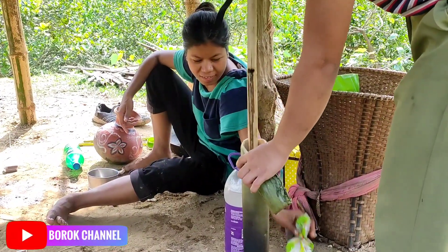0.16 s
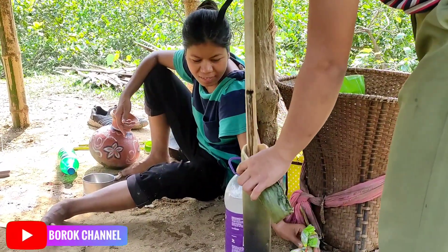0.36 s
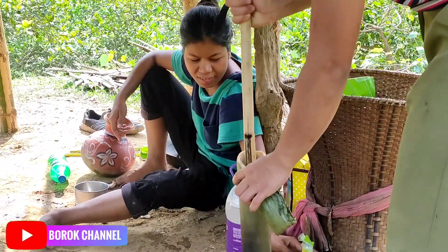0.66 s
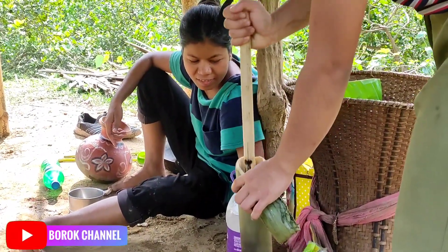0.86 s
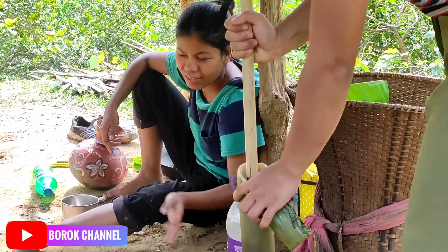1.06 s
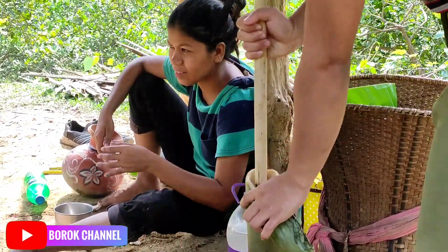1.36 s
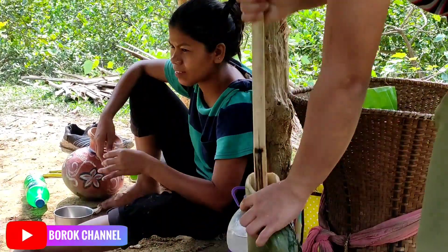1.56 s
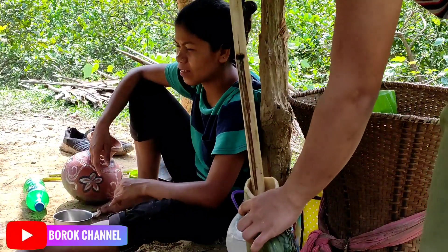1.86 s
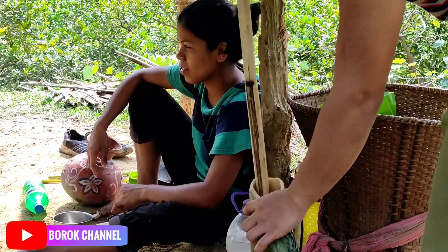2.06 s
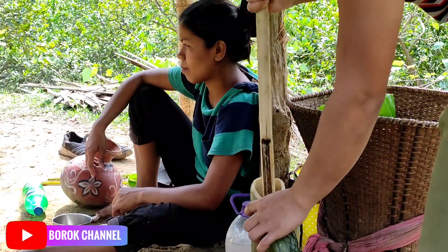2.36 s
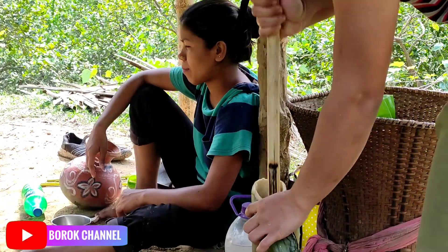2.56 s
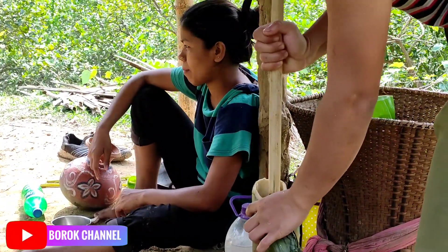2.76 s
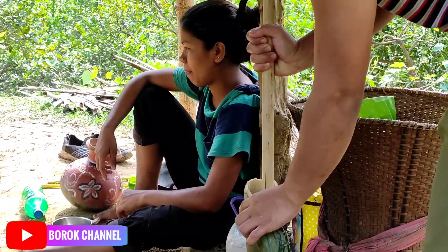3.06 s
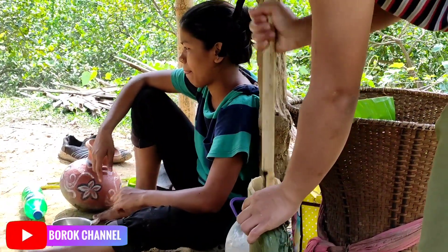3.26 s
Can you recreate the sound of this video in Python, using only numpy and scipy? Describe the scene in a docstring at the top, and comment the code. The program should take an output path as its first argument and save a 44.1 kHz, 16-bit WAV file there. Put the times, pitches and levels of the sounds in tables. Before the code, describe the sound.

A bamboo stick in a green bamboo tube makes a sharp, woody scraping knock at 0.3 s, with small wet ticks crackling until about 1.4 s. A dull short rub comes at 1.7, softer grainy slides at 2.0-2.5, and a muffled thud with a trailing slide at 3.05. Throughout, breeze thumps low on the left, foliage hisses, birds chirp mostly right, and a faint high insect pulses.

```python
"""From the start a breeze thumps on the left microphone port, foliage hisses and an insect pulses high up,
each built from shaped noise or a swept tone; small birds chirp mostly to the right, as gliding whistles.
Soon small wet ticks crackle, then a bamboo stick worked up and down in a green bamboo tube gives a sharp
scraping knock; softer slides follow: grainy friction noise rubs the wall and excites its resonances."""
import sys
import numpy as np
from scipy import signal
from scipy.fft import rfft, irfft, next_fast_len
from scipy.io import wavfile
from scipy.ndimage import uniform_filter1d, map_coordinates

SR = 44100
rng = np.random.default_rng(int(sys.argv[2]) if len(sys.argv) > 2 else 0)


def transcribe(signal):
    """Save signal, clipped to [-1, 1], as a 16-bit WAV file at the path in sys.argv[1]."""
    frames = np.atleast_2d(signal).T
    limited = np.clip(frames, -1, 1)
    pcm = np.round(limited * 32767).astype(np.int16)
    wavfile.write(sys.argv[1], SR, pcm)


N = 149940


def amp(db):
    """Level to amplitude ratio: 20 dB is a factor of ten."""
    return 10 ** (np.asarray(db) / 20)


def unit(x):
    """Normalisation to an rms of 1."""
    return x / np.sqrt(np.mean(x ** 2) + 1e-20)


def clock():
    """Sampling instants in seconds."""
    return np.arange(N) / SR


def curve(rows):
    """Linear interpolation through (seconds, value) points."""
    return np.interp(clock(), *np.transpose(rows))


def pan(db):
    """Interaural level difference: half of it raises the left, half lowers the right."""
    return amp(np.array([[db], [-db]]) / 2)


def filtered(x, response):
    """Linear filtering: the spectrum is multiplied by a response of frequency."""
    size = next_fast_len(N + SR // 2)
    spectrum = rfft(x, size) * response(np.fft.rfftfreq(size, 1 / SR))
    return irfft(spectrum, size)[..., :N]


def coloured(x, points):
    """Spectral shaping by (Hz, dB) points on a logarithmic frequency axis, to rms 1."""
    freq, db = np.transpose(points)
    return unit(filtered(x, lambda hz: amp(np.interp(np.log(hz + 1), np.log(freq), db))))


def wobble(rate):
    """Band-limited random fluctuation: a spline through rate random knots a second."""
    knots = rng.standard_normal(int(N * rate / SR) + 4)
    return map_coordinates(knots, [clock() * rate])


# Likeness of the two sides. Each row: frequency in Hz, correlation.
SIDE_CORRELATION = [(300, 0.72), (850, 0.28), (1300, 0.04), (1900, -0.26), (2350, 0.26), (3200, -0.14),
                    (5000, -0.03)]


def pair():
    """Interaural coherence: two noises alike in the bass and less alike, even opposed, above."""
    freq, correlation = np.transpose(SIDE_CORRELATION)

    def angle(hz):
        likeness = np.interp(np.log(hz + 1), np.log(freq), correlation)
        return np.arccos(np.clip(likeness, -1, 1)) / 2

    noises = rng.standard_normal((2, N))
    mid, side = filtered(noises, lambda hz: np.array([np.cos(angle(hz)), np.sin(angle(hz))]))
    return np.array([mid + side, mid - side])


def envelope(start, attack, hold, t60):
    """Transient decay: linear rise, hold, then an exponential fall of 60 dB in t60 seconds."""
    t = clock() - start
    release = 1e-3 ** (np.maximum(t - attack - hold, 0) / t60)
    return np.clip(t / attack, 0, 1) * release


def scattered(x, t60, direct_db):
    """Multiple scattering: direct sound plus a dense, exponentially decaying echo tail."""
    t = np.arange(SR // 2) / SR
    tail = rng.standard_normal((2, len(t))) * np.exp(-np.log(1000) * t / t60)
    echoes = signal.fftconvolve(x, tail / np.linalg.norm(tail[0]), axes=1)[:, :N]
    return amp(direct_db) * x + echoes


# Turbulence at the left port. Each row: time in seconds, level in dB before random fluctuation.
BREEZE = [(0, -37), (.07, -46), (.165, -29), (.21, -47.5), (.3, -48.5), (.35, -43), (.51, -36), (.7, -52),
          (.92, -45.5), (1.06, -51), (1.33, -45), (1.47, -56), (1.8, -44.5), (1.93, -53), (2.03, -36),
          (2.17, -49.5), (2.42, -44.5), (2.49, -37), (2.62, -41.5), (2.73, -31.5), (2.83, -38), (2.89, -48),
          (3.08, -55.5), (3.17, -30.5), (3.23, -55), (3.31, -39), (3.4, -58)]
# Spectrum of the slow turbulence. Each row: frequency in Hz, relative level in dB.
RUMBLE = [(12, -1), (30, -2), (65, -3), (110, -10.5), (170, -32.5), (300, -36), (600, -66)]
# Spectrum of the faster turbulence. Each row: frequency in Hz, relative level in dB.
FLUTTER = [(60, 0.5), (150, 10.5), (250, -9.5), (400, -22.5), (900, -53.5)]
# Eddies that thump on the port. Each row: time in seconds, level in dB, pitch in Hz.
EDDIES = [(0.107, -29, 40.7), (.158, -36, 140), (.166, -24.5, 62), (0.339, -34.5, 105), (0.358, -29, 56),
          (0.422, -30.5, 35.2), (0.508, -30.5, 84.6), (0.783, -32.5, 50), (0.873, -33.5, 59.6),
          (0.949, -33, 41.8), (1.196, -33, 43), (1.327, -38, 48.7), (1.761, -34, 59.4),
          (2.001, -25.5, 67.6), (2.096, -32, 50.5), (2.245, -29.5, 45.3), (2.474, -30.5, 112),
          (2.503, -25, 43.3), (2.698, -32, 85), (2.755, -29, 91), (2.793, -27, 65.4), (2.829, -31.5, 87),
          (3.164, -30, 54), (3.299, -36.5, 101)]
FLUTTER_DB, BREEZE_REF_DB = -57.5, -40  # flutter level when the breeze is at the reference
FLUTTER_GROWTH = 1.72  # dB of flutter per dB of breeze
EDDY_CYCLES, EDDY_SKEW = 0.39, 0.62  # Gaussian width; phase skew in radians steepens one flank


def wind():
    """Turbulent pressure: noise whose flutter outgrows its rumble, and single eddies as brief pulses."""
    level_db = curve(BREEZE) + 1.04 * wobble(24.88)
    flutter_db = FLUTTER_DB + FLUTTER_GROWTH * (level_db - BREEZE_REF_DB)
    port = amp(level_db) * coloured(rng.standard_normal(N), RUMBLE)
    port += amp(flutter_db) * coloured(rng.standard_normal(N), FLUTTER)
    for when, db, hz in EDDIES:
        cycles = (clock() - when) * hz
        swell = np.exp(-.5 * (cycles / EDDY_CYCLES) ** 2)
        phase = 2 * np.pi * cycles
        port += amp(db) * swell * np.cos(phase + EDDY_SKEW * swell * np.cos(phase))
    return port * np.array([[1], [0]])  # left only


# Foliage and distance. Each row: time in seconds, level in dB before fluctuation and panning.
AIR_LEVEL = [(0, -54), (.6, -54.5), (1.15, -56.5), (1.7, -54), (2.4, -54), (2.8, -56), (3.4, -54)]
# Spectrum at the left ear. Each row: frequency in Hz, relative level in dB per Hz.
AIR_LEFT = [(30, 25.5), (150, 16), (400, 1.5), (900, 1), (1200, -2), (2400, 1.5), (3500, -1.5),
            (4500, -3.5), (5300, -4), (8500, -4), (9800, -2.5), (10600, -7), (14500, -8)]
# Spectrum at the right ear. Each row: frequency in Hz, relative level in dB per Hz.
AIR_RIGHT = [(30, 27), (100, 13), (200, 8), (400, 3.5), (680, -5.5), (930, 2), (1300, -3), (2400, 5),
             (3200, 2), (4400, 0.5), (5200, 3), (5900, -0.5), (7200, 3.5), (8500, -8.5), (10200, -1.5),
             (12500, -4.5), (14500, -10)]
AIR_PAN_DB, AIR_PATCHY_DB = -1.5, 2  # left-right difference; rms gain of the patches


def air():
    """Diffuse field: a hiss patchy in time and frequency, over a faint rumble."""
    cells = signal.stft(pair(), nperseg=512)[2]
    patches = uniform_filter1d(rng.standard_normal(cells.shape[1:]), size=6, axis=0)  # across frequency
    patches = uniform_filter1d(patches, size=9, axis=1)  # across time
    left, right = signal.istft(cells * amp(AIR_PATCHY_DB * unit(patches)), nperseg=512)[1][:, :N]
    hiss = np.array([coloured(left, AIR_LEFT), coloured(right, AIR_RIGHT)])
    return amp(curve(AIR_LEVEL) + 0.36 * wobble(7.7)) * pan(AIR_PAN_DB) * hiss


# Insect song. Each row: time in seconds, level in dB before panning and echo, middle pitch in Hz.
INSECT = [(0, -90, 11270), (.6, -83, 11360), (1.199, -78.5, 11100), (1.4, -77.5, 10820),
          (1.9, -76.5, 10940), (2.299, -79, 10800), (3.4, -84, 10820)]
INSECT_PULSE_HZ, INSECT_PAN_DB = 39.8, -14
INSECT_SWEEP_HZ, INSECT_ROUGH_HZ = 420, 480  # sweep to each side of the pitch; random deviation
INSECT_ECHO_S, INSECT_DIRECT_DB = .14, -0.5  # t60 of the echoes; direct sound


def insect():
    """Stridulation: each wing stroke of a bush cricket is a short, rough falling sweep."""
    when, level_db, pitch_hz = np.transpose(INSECT)
    stroke = (clock() * INSECT_PULSE_HZ) % 1
    hz = np.interp(clock(), when, pitch_hz) + INSECT_SWEEP_HZ * (1 - 2 * stroke)
    hz += INSECT_ROUGH_HZ * wobble(2500)
    rasp = unit(np.sin(np.pi * stroke) ** 2 * np.sin(2 * np.pi * np.cumsum(hz) / SR))
    song = amp(np.interp(clock(), when, level_db)) * pan(INSECT_PAN_DB) * rasp
    return scattered(song, INSECT_ECHO_S, INSECT_DIRECT_DB)


def note(start, length, start_hz, end_hz, rough_hz):
    """Frequency modulation: a gliding whistle with random pitch jitter and a quick swell."""
    u = np.linspace(0, 1, int(length * SR))
    jitter = map_coordinates(rng.standard_normal(1024), [u * length * 1500], mode="wrap")
    hz = start_hz + (end_hz - start_hz) * u + rough_hz * jitter
    swell = np.abs(np.sin(np.pi * u ** 0.61))
    whistle = swell * np.sin(2 * np.pi * np.cumsum(hz) / SR)
    return np.pad(whistle, (max(round(start * SR), 0), N))[:N]


TWITTER_COUNT, TWITTER_S, TWITTER_DB = 30, 0.0364, -62  # level before the birds' common gain
TWITTER_LOW_HZ, TWITTER_HIGH_HZ = 2293, 5480  # range of starting pitches
CALL_ROUGH_HZ = 125
CHIRP_PAN_DB = -7.5


def twitter():
    """Random superposition: faint falling notes at chance times, pitches and places."""
    out = np.zeros((2, N))
    for when, pitch, fall, place in rng.random((TWITTER_COUNT, 4)):
        hz = TWITTER_LOW_HZ + pitch * (TWITTER_HIGH_HZ - TWITTER_LOW_HZ)
        whistle = note(when * N / SR, TWITTER_S, hz, hz * (1 - 0.21 * fall), CALL_ROUGH_HZ)
        out += pan(CHIRP_PAN_DB * place) * whistle
    return amp(TWITTER_DB) * out


# High chirps. Each row: start in seconds, length in seconds, level in dB before the common gain.
CHIRPS = [(0.023, 0.073, -48), (0.247, 0.07, -55), (0.897, 0.097, -53), (1.138, 0.068, -50.5),
          (1.422, 0.054, -52), (1.563, 0.053, -53.5), (1.667, 0.11, -54), (1.845, 0.09, -54.5),
          (1.998, 0.12, -51.5), (2.228, 0.081, -51.5), (2.46, .08, -55), (2.659, 0.084, -55.5),
          (2.918, 0.047, -55.5), (3.044, 0.12, -52.5), (3.179, 0.076, -55)]
# Farther birds. Each row: start in seconds, length in seconds, start pitch in Hz, end pitch in Hz,
# level in dB before the common gain, left-right difference in dB.
CALLS_FAR = [(0.147, 0.041, 3040, 2680, -56.5, -13), (0.155, 0.05, 5680, 4780, -59, -15),
             (0.684, 0.05, 5250, 5120, -63, -11), (.79, 0.039, 5170, 5220, -54.5, -10),
             (0.911, .05, 3100, 2550, -52.5, -7), (1.047, 0.035, 5530, 5160, -62, -11),
             (1.203, 0.053, 6510, 6350, -59, -10), (1.209, .04, 5430, 5200, -61, -9),
             (1.317, .035, 6240, 7000, -58, -6), (1.351, 0.018, 5270, 5180, -57.5, -8),
             (1.478, 0.032, 6620, 6450, -54.5, -3), (1.866, 0.021, 4030, 3700, -53.5, -7),
             (2.353, 0.028, 3870, 4360, -54.5, -9), (2.544, 0.033, 3710, 3010, -57.5, -8),
             (2.621, 0.04, 5300, 5410, -59, -11.5), (2.782, 0.037, 5440, 5000, -62, 4),
             (2.877, 0.075, 4000, 2650, -54.5, -8), (2.928, 0.031, 5430, 5330, -62, -12),
             (2.787, 0.17, 940, 1048, -62.5, -2), (2.9, 0.124, 993, 881, -58, -1)]
CHIRP_HZ, CHIRP_FALL, CHIRP_BUZZ_HZ = 7320, 0.078, 390  # start pitch; fraction it falls; jitter
TREES_T60_S, BIRDS_DB, DIRECT_DB = 0.15, -5, -8  # echo decay; common gain; direct sound


def birds():
    """Scattering by trees: buzzy falling chirps and farther calls arrive mostly as echoes."""
    song = twitter()
    for start, length, db in CHIRPS:
        chirp = note(start, length, CHIRP_HZ, CHIRP_HZ * (1 - CHIRP_FALL), CHIRP_BUZZ_HZ)
        song += amp(db) * pan(CHIRP_PAN_DB) * chirp
    for start, length, start_hz, end_hz, db, pan_db in CALLS_FAR:
        song += amp(db) * pan(pan_db) * note(start, length, start_hz, end_hz, CALL_ROUGH_HZ)
    return amp(BIRDS_DB) * scattered(song, TREES_T60_S, DIRECT_DB)


GRAINS_PER_S, GRAIN_S, GRAIN_DB = 550, .0007, -2  # decay time; level against the smooth rub


def friction():
    """Stick-slip: fibres catch and slip in brief crunchy bursts over a smooth rub."""
    slips = (rng.random(N) < GRAINS_PER_S / SR) * rng.random(N)
    bursts = signal.lfilter([1], [1, -np.exp(-1 / (GRAIN_S * SR))], slips)
    return unit(pair() + amp(GRAIN_DB) * unit(bursts * pair()))


# Wet ticks of the mash. Each row: start in seconds, level in dB, left-right difference in dB.
TICKS = [(0.234, -57, 9), (.360, -46, -2), (.410, -54, 0), (0.424, -49.5, 1), (0.461, -53, 1),
         (0.526, -50.5, 5.5), (0.591, -67, 9), (0.62, -62, 11), (0.734, -56, 14), (0.792, -54, 1),
         (.871, -54.5, 9), (.895, -54, 6), (0.963, -55.5, 11), (1.28, -57, 1), (1.329, -54, 6),
         (1.359, -55, 2), (1.649, -54.5, -14), (2.128, -52, 0)]
# Spectrum of a tick. Each row: frequency in Hz, relative level in dB.
TICK_COLOUR = [(300, -38), (900, -5), (2500, 1), (4500, -7), (8000, -0.5), (14000, -4.5)]
TICK_T60_S = 0.027


def ticks():
    """Impulsive excitation: the wet mash crackles in short, fast-decaying bursts of friction noise."""
    level = np.zeros((2, N))
    for start, db, pan_db in TICKS:
        level += amp(db) * pan(pan_db) * envelope(start, 0.0022, 0.00026, TICK_T60_S)
    return level * coloured(friction(), TICK_COLOUR)


# Resonances of the tube. Each row: frequency in Hz, undamped width in Hz, relative level in dB.
TUBE = [(400, 32, -10), (900, 150, -10.5), (2067, 17, -9.5), (2332, 44, 0.5), (2534, 60, -1.5),
        (2980, 230, -5.5), (5440, 72, -4.5), (7350, 700, -12.5)]


def ringing(x, damping):
    """Damped resonance: the tube's modes widen as the stick presses on the wall; rms 1."""
    def modes(f):
        total = 0
        for centre, width, db in TUBE:
            loss = 1j * f * width * damping
            total = total + amp(db) * loss / (centre * centre - f * f + loss)
        return total

    return unit(filtered(x, modes))


# Strokes of the stick. Each row: start in seconds, attack in seconds, hold in seconds, release t60 in
# seconds, level in dB before tilt and ring, treble tilt in dB per octave, ring in dB against the rub,
# damping as a factor on the resonance widths, left-right difference in dB.
STROKES = [(0.301, 0.0052, 0.0022, 0.021, -46, 1.5, -3, 1.5, -2),
           (0.3118, 0.0014, 0.0069, 0.019, -44, -1.5, -5, 0.83, 2.5),
           (0.319, 0.006, 0.009, 0.07, -46, 2, -8.5, 1.5, 0),
           (0.339, 0.013, 0.029, 0.045, -54, 1.7, -7, 2.9, 0.5),
           (1.698, .006, 0.019, 0.18, -50, -16, -7, 4, -4.5),
           (1.989, 0.023, 0.047, 0.17, -53, -5.5, -7, 6.5, -4),
           (2.057, 0.042, 0.052, 0.82, -57, 0, -7.5, 6, -7),
           (2.197, 0.05, 0.045, 0.64, -58, -2, -9.5, 6, -6),
           (3.052, 0.00083, 0.014, 0.066, -44.5, -19, -14, 5, -4),
           (3.065, 0.01, 0.037, 0.31, -50, -2.5, -5.5, 6, -7),
           (3.137, 0.038, 0.042, 1, -59, -1.5, -5.5, 5, -7),
           (3.343, 0.024, 0.052, 0.25, -66.5, -1, 2.5, 5, -8)]
# Wall under the stick, left side. Each row: frequency in Hz, relative level in dB per Hz.
WALL_LEFT = [(150, -13), (400, -10), (620, -14), (900, 5.5), (1100, -14.5), (1600, 3.5), (2400, -9),
             (3500, 1), (4600, -4), (6000, -14.5), (6800, -5), (8400, -0.5), (10200, -7), (12500, -1),
             (15000, -9)]
# Wall under the stick, right side. Each row: frequency in Hz, relative level in dB per Hz.
WALL_RIGHT = [(150, -17), (400, -20), (620, -21), (900, -8), (1300, -5.5), (2200, 0.5), (4000, -4.5),
              (4600, -5), (5400, -6), (7300, -1), (8500, -13), (9600, -14.5), (15000, -8.5)]
RING_SPREAD_DB = 4  # two-sided drive against the drive common to both sides
JUDDER_DB, JUDDER_PER_S = 1, 160
TILT_FROM_HZ = 3060


def stick():
    """Source and resonator: each stroke rubs the tube's wall and excites its resonances."""
    left, right = friction()
    wall = np.array([coloured(left, WALL_LEFT), coloured(right, WALL_RIGHT)])
    drive = friction()[0] + amp(RING_SPREAD_DB) * friction()
    judder = amp(JUDDER_DB * wobble(JUDDER_PER_S))
    out = np.zeros((2, N))
    for start, attack, hold, t60, db, tilt_db, ring_db, damping, pan_db in STROKES:
        rub = judder * (wall + amp(ring_db) * ringing(drive, damping))
        scrape = filtered(rub, lambda hz: amp(tilt_db * np.log2(np.hypot(1, hz / TILT_FROM_HZ))))
        out += amp(db) * pan(pan_db) * envelope(start, attack, hold, t60) * scrape
    return out


# The stick strikes the wall. Each row: time in seconds, level in dB before each mode's own level.
KNOCKS = [(.3115, -44.5), (.3150, -53), (0.3618, -56), (1.704, -58), (3.091, -60)]


def knock():
    """Free vibration: each hard contact leaves the tube's modes ringing and decaying by their widths."""
    out = np.zeros((2, N))
    for when, level_db in KNOCKS:
        t = np.maximum(clock() - when, 0)
        for hz, width, db in TUBE:
            gain = amp(level_db + db + rng.normal(0, 1, (2, 1)))  # each side varies by chance
            out += gain * np.exp(-np.pi * width * t) * np.sin(2 * np.pi * hz * t)
    return out


def scene():
    """Superposition of the breeze, the yard and the work at the tube."""
    return wind() + air() + insect() + birds() + ticks() + stick() + knock()


TOP_HZ = 14400


def record(dry):
    """Band limitation: an ideal low-pass filter removes everything from TOP_HZ up."""
    return filtered(dry, lambda hz: hz < TOP_HZ)


dry = scene()
out = record(dry)
transcribe(out)
```